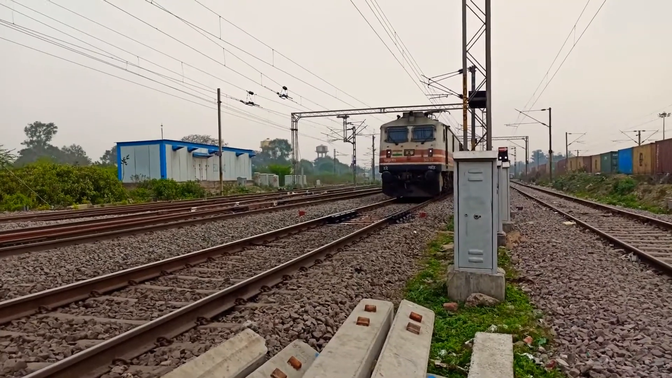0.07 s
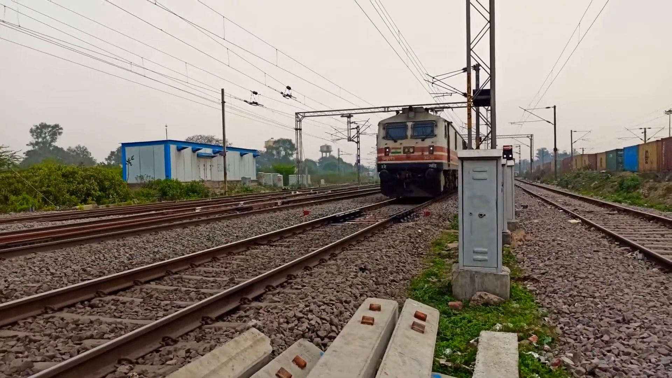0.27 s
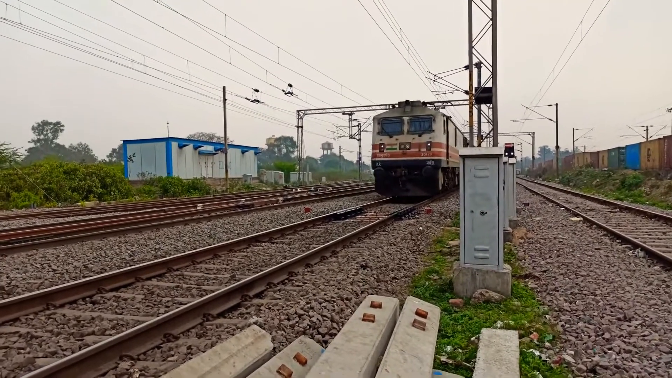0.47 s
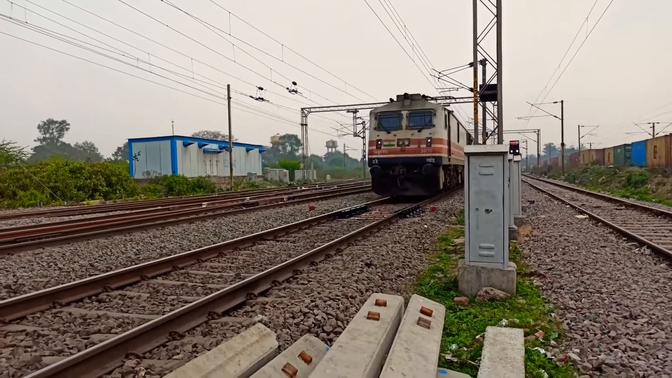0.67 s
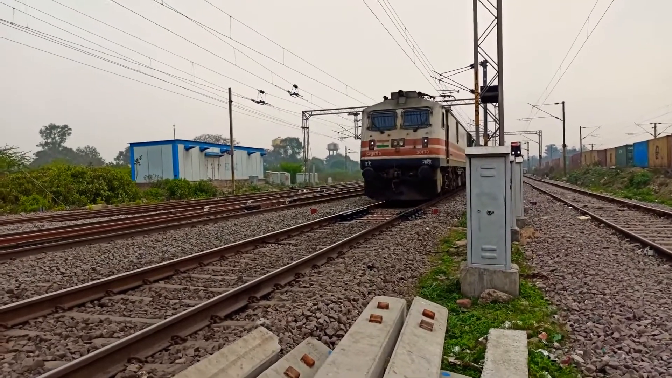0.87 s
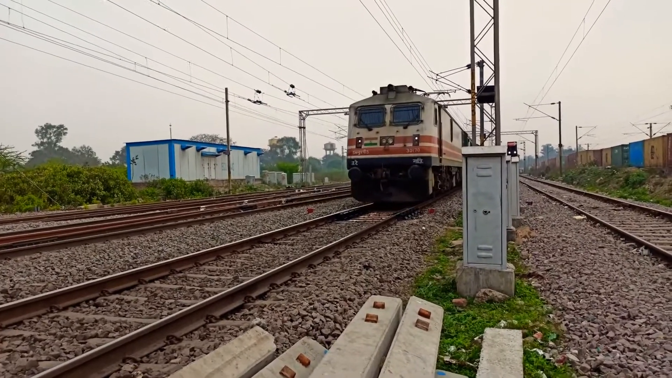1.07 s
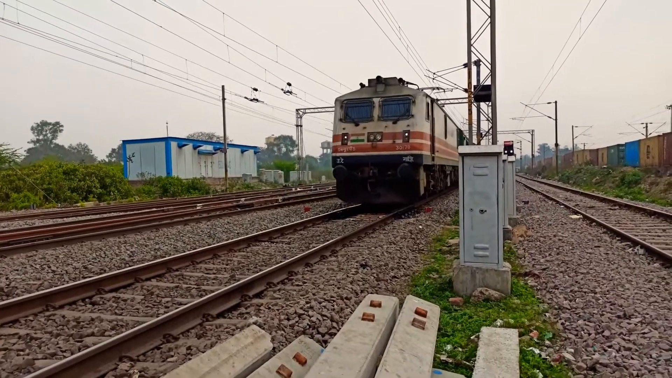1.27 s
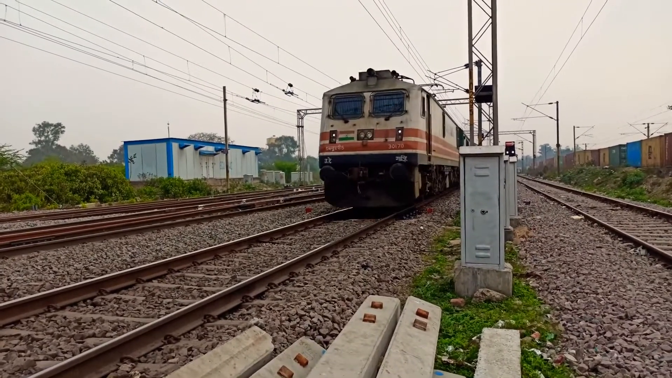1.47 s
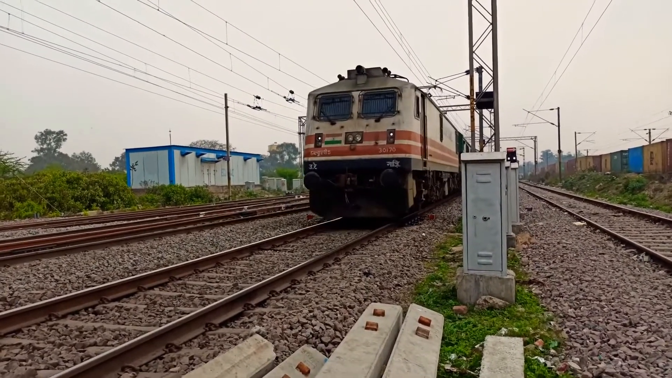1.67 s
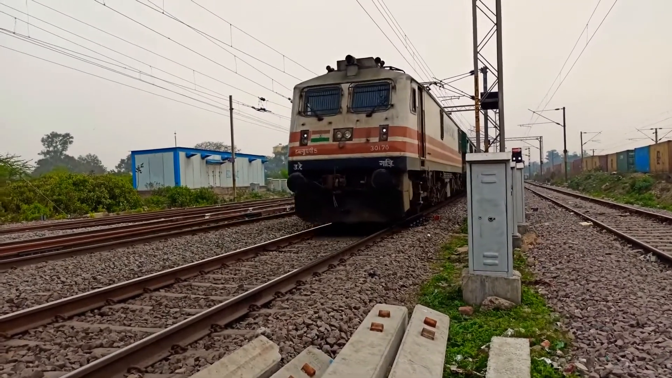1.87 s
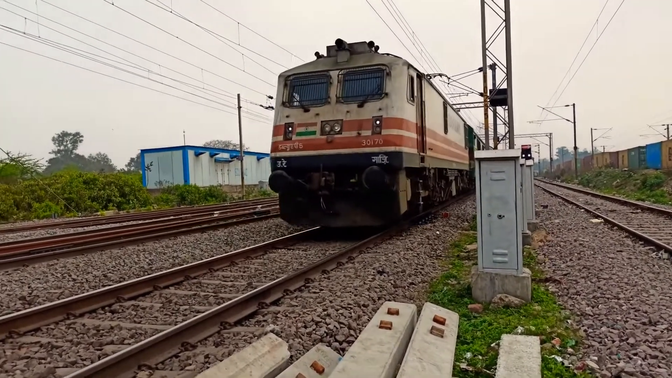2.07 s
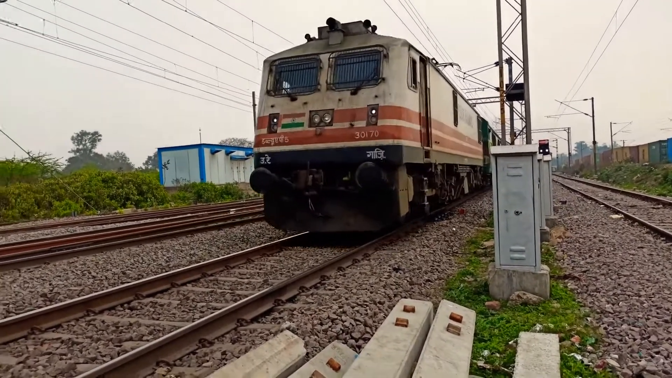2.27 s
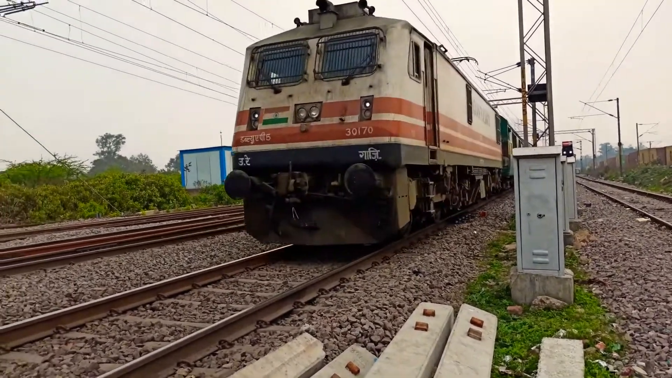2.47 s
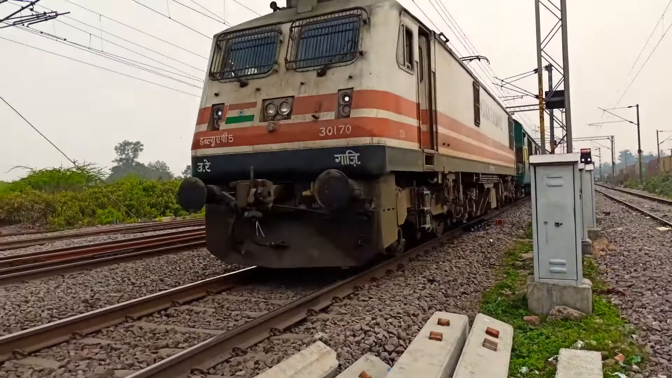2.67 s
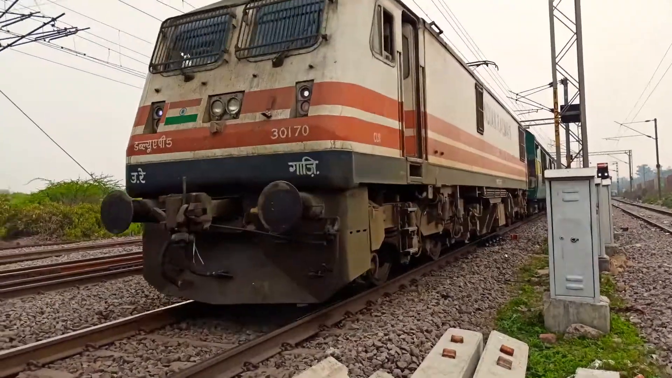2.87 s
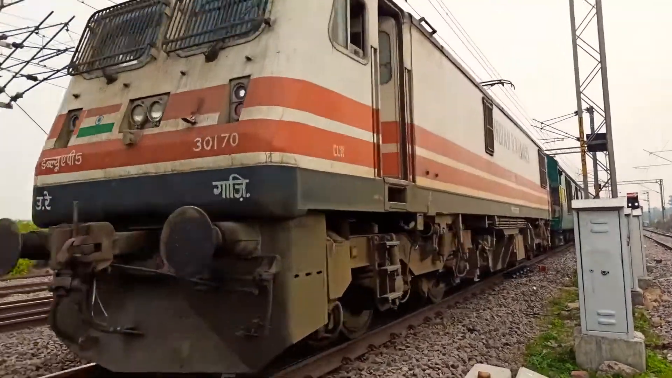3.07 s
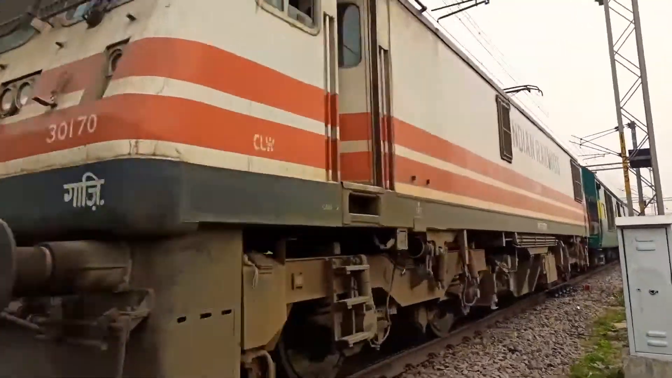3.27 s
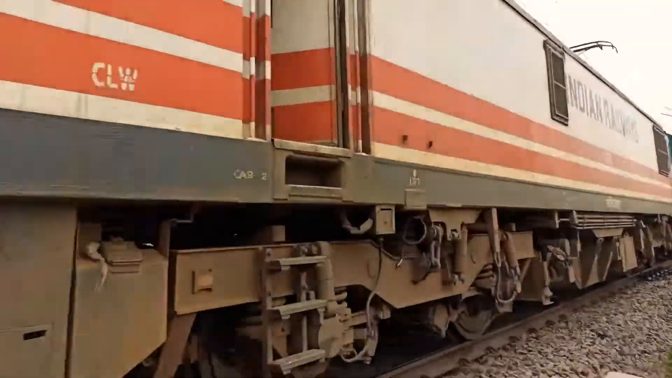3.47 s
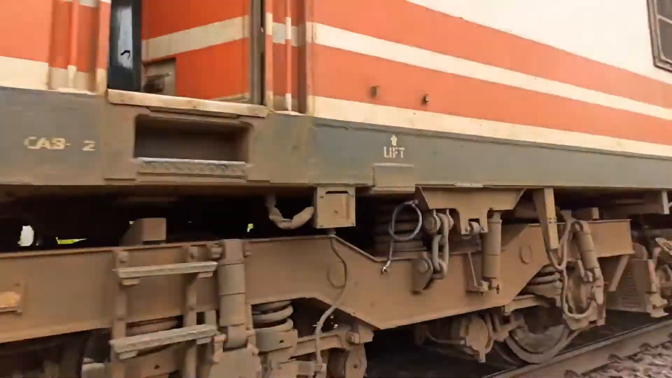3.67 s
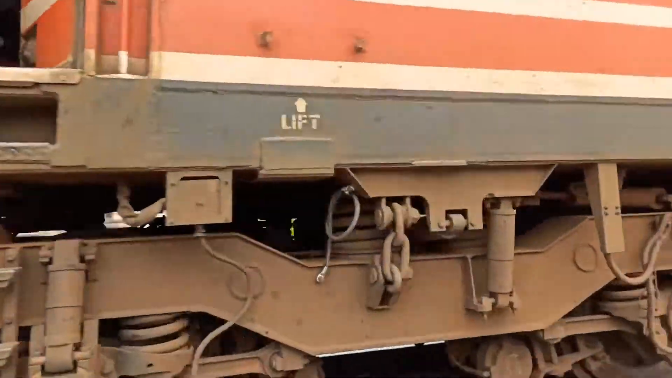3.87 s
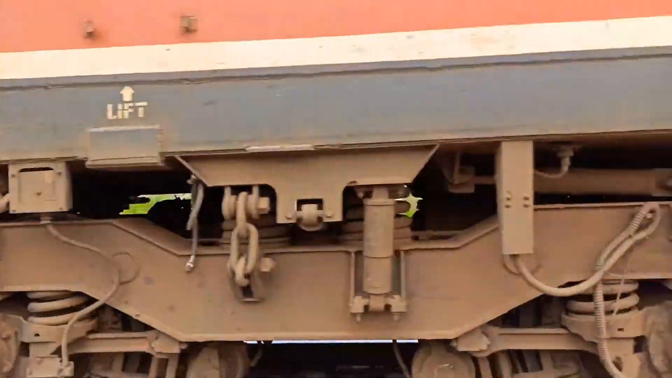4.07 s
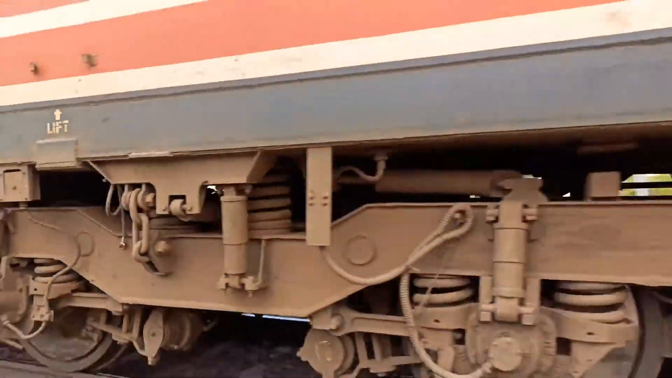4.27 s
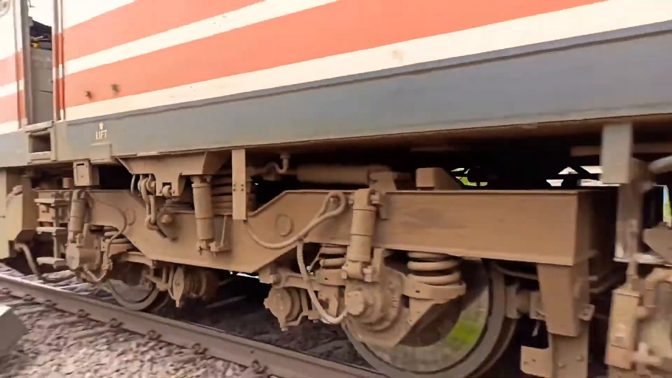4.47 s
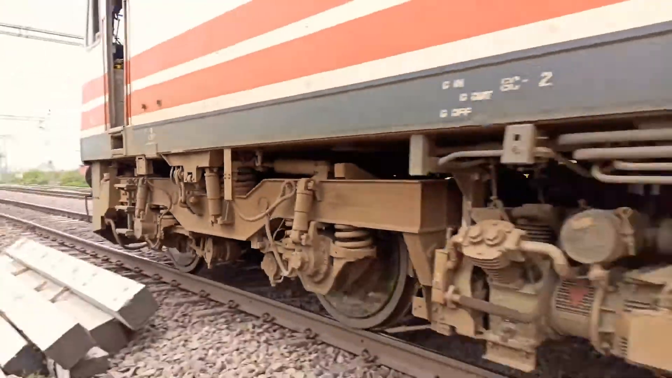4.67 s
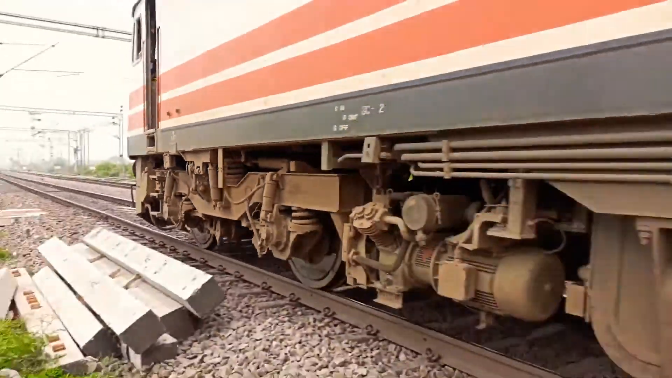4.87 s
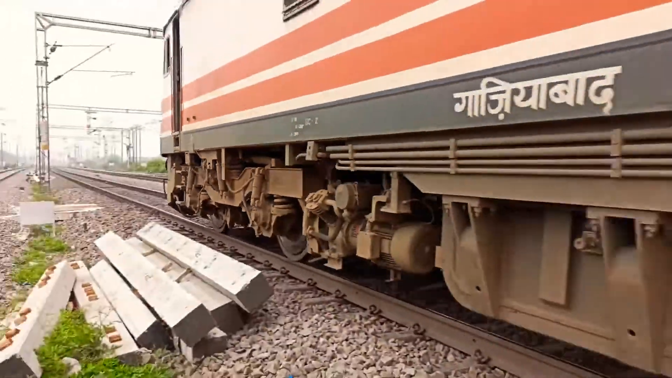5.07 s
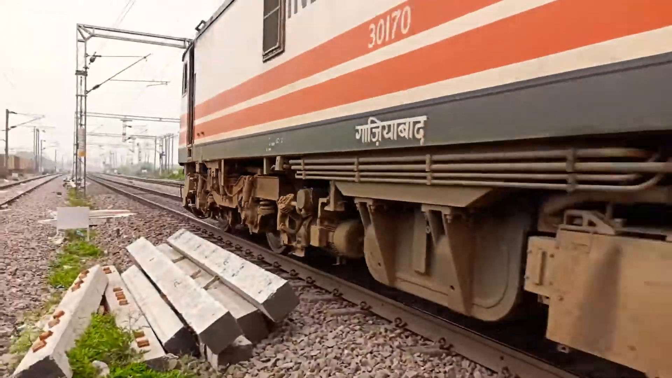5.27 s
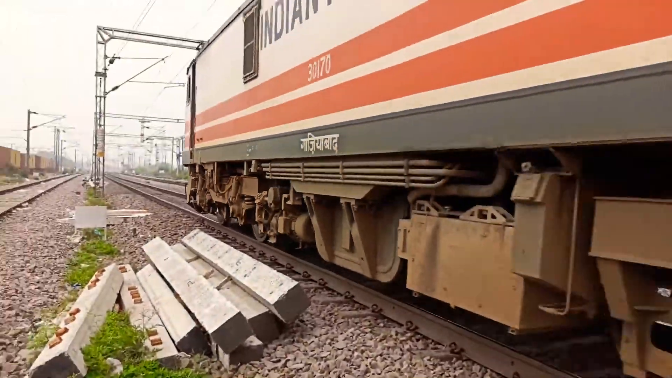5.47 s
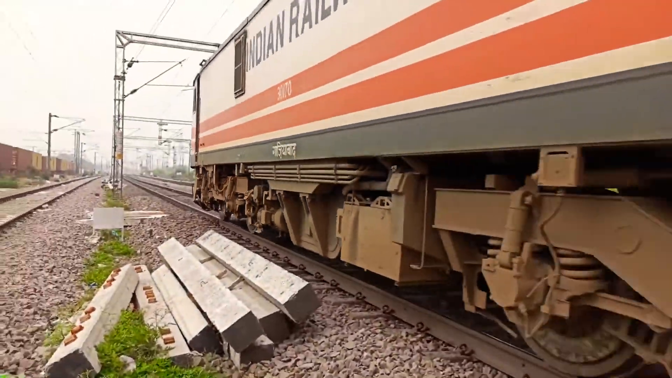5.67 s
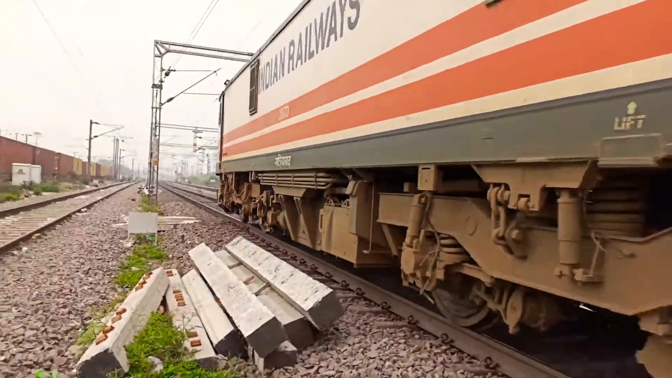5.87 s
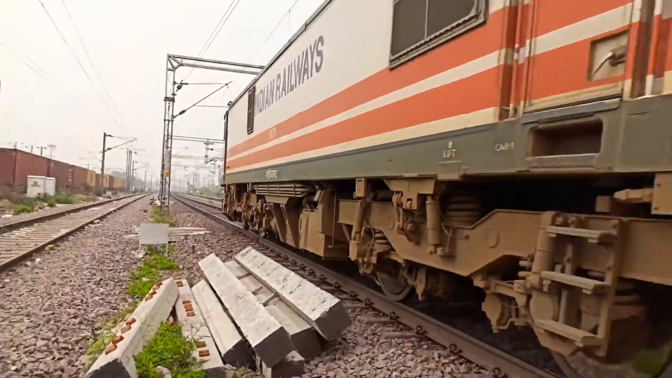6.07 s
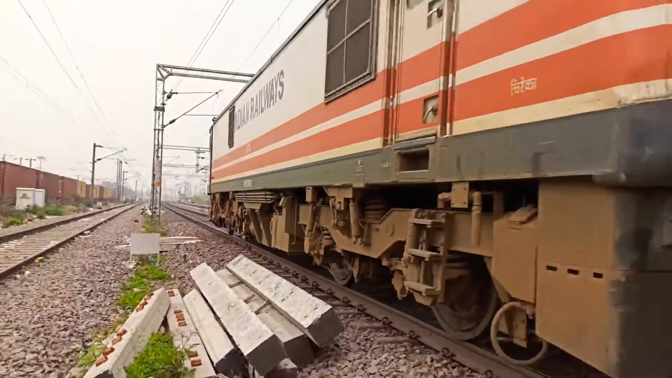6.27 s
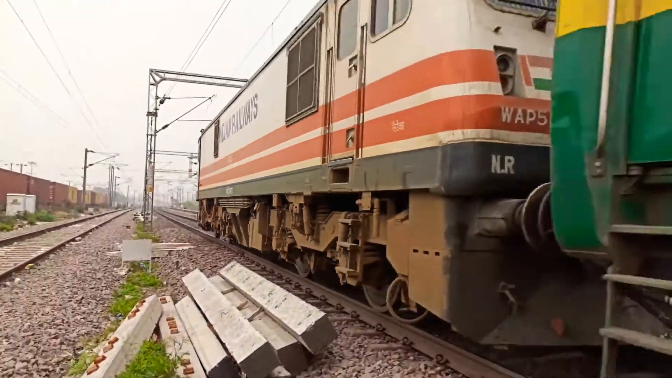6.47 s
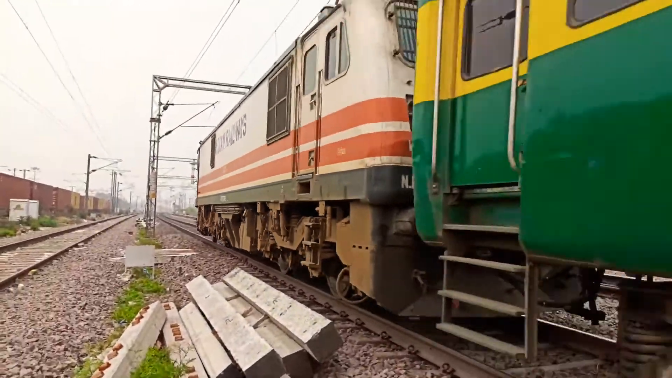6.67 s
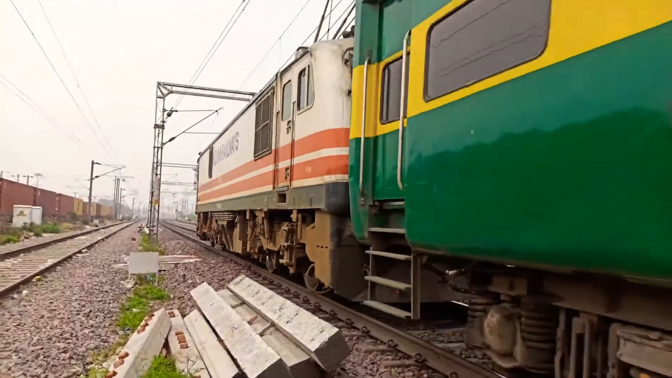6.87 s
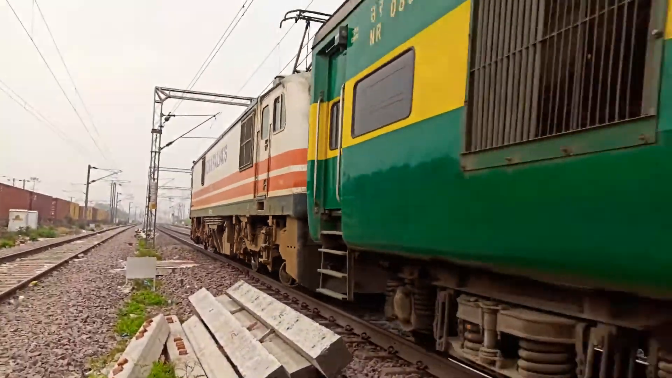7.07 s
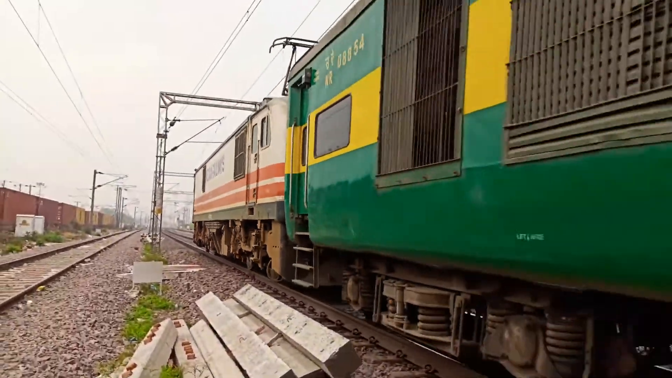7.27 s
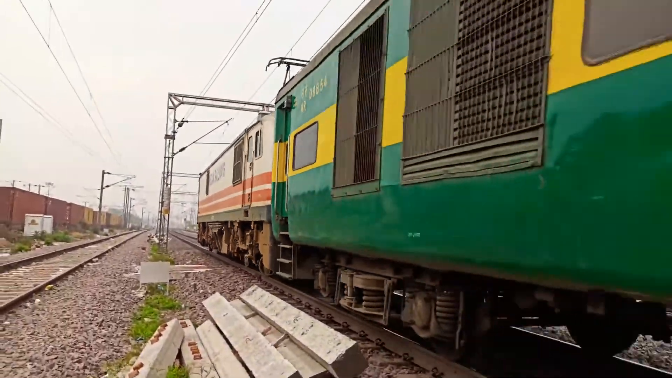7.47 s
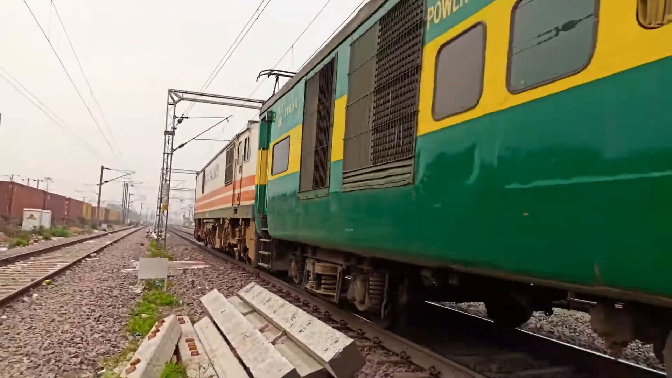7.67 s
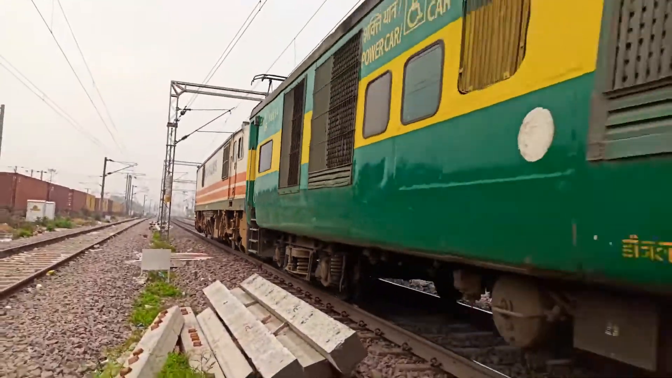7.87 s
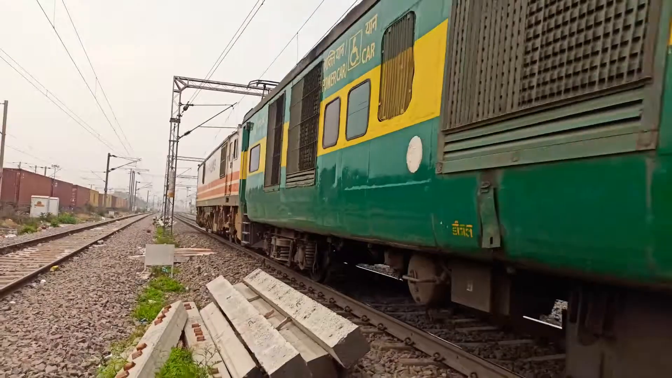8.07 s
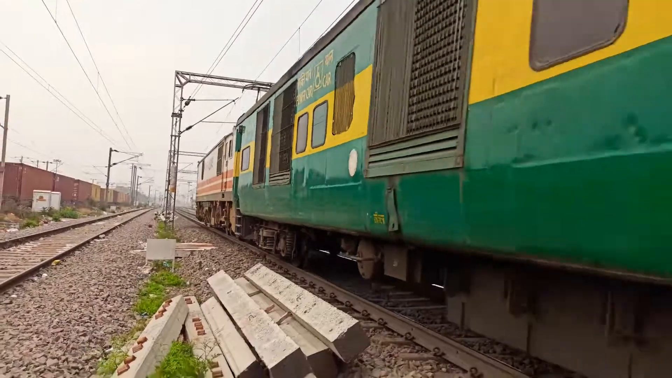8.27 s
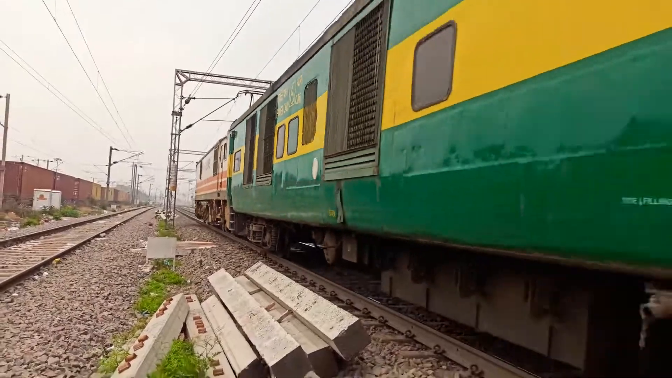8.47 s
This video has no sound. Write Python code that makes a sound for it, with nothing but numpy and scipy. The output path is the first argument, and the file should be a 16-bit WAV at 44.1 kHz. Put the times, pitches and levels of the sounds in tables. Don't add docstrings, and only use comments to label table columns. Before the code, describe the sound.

In the open beside a railway, a slow electric locomotive begins far off: a low, beating generator hum, soft rolling rumble and faint flange hiss. From about 0.55 s a thin, very high squeal sings in broken stretches. Between 1.7 and 2.2 s wheels knock over a rail joint in a rapid cluster of bright cracks, clanks and dull thuds. A piercing squeal follows immediately, and until 3.2 s several shrill metallic pitches overlap with scraping hiss, slightly overloading the close stereo microphone and pushing down the bass. Around 3.2 to 4.7 s motor whine flickers past, sinking slightly, with gear drones and swelling rumble. Another squeal and scrape burst comes near 4.7 s, fading by 5.5. At 6.25 s the coupling gap briefly thins the roar; then a coach rolls by to 8.5 s with heavy rumble, pulsing generator hum and weaker squeals.

```python
import sys
import numpy as np
from scipy import signal
from scipy.io import wavfile
from scipy.ndimage import uniform_filter1d

SR = 44100
rng = np.random.default_rng(int(sys.argv[2]) if len(sys.argv) > 2 else 0)


def volts_from_decibels(level):
    exponent = np.asarray(level, float) / 20
    return 10 ** exponent


def transcribe(u):
    v = np.clip(np.atleast_2d(u).T, -1, 1)
    q = np.round(v * 32767).astype(np.int16)
    wavfile.write(sys.argv[1], SR, q)


N = 375732


def evened(x):
    return x / np.sqrt(np.mean(abs(x) ** 2) + 1e-20)


def read(points, hz):
    f, value = np.transpose(points)
    return np.interp(np.log(hz + 1), np.log(f + 1), value)


def columns(rows, t):
    s, *rest = np.transpose(rows)
    return [np.interp(t, s, c) for c in rest]


def bump(t, s, width):
    return np.exp(-((t - s) / width) ** 2)


def bursts(rows, t, rise_db, fall_db, rest_db):
    coarse = t[::40]
    each = []
    for s, end, first, last in rows:
        end = max(end, s)
        corners = [s - 1, s, end, end + 1]
        each.append(np.interp(coarse, corners, [first - rise_db, first, last, last - fall_db]))
    return np.interp(t, coarse, np.maximum(np.max(each, axis=0), rest_db))


def inside(rows, t, hz):
    return np.any([(t >= a) & (t <= b) & (hz >= low) & (hz <= high) for a, b, low, high in rows], axis=0)


def lateness(hz, t):
    # t/s, lag/samples
    port_lag = [(0, -17), (2.7, -19), (3.2, 16), (4, 15), (8.52, 15)]
    spread_hz = 810
    in_step = 1 + (spread_hz / (hz + 1)) ** 4
    return np.exp(-2j * np.pi * hz * columns(port_lag, t)[0] / SR / in_step)


def noise(layers, size, patchy_db, flicker_db):
    # f/Hz, likeness/0-1
    likeness = [(60, 0.88), (250, 0.92), (600, 0.51), (950, 0.4), (1400, 0.35), (2200, 0.15), (5000, 0.12),
                (12000, 0.25)]
    hop = size // 4
    t = np.arange(N // hop + 5) * hop / SR
    hz = np.fft.rfftfreq(size, 1 / SR)[:, None]
    a, b, c, d, patches = rng.standard_normal((len(t), len(hz), 5)).T
    patches = uniform_filter1d(patches, size=10, axis=0)
    patches = evened(uniform_filter1d(patches, size=10, axis=1))
    flicker = evened(uniform_filter1d(rng.standard_normal(len(t)), size=4))
    power = 0
    for shape, db in layers:
        colour = volts_from_decibels(read(shape, hz)) ** 2
        power = power + colour / np.mean(colour) * volts_from_decibels(np.interp(t, np.arange(N) / SR, db)) ** 2
    same = np.clip(read(likeness, hz), 0, 1)
    right = a + 1j * b
    left = lateness(hz, t) * same * right + np.sqrt(1 - same ** 2) * (c + 1j * d)
    z = np.array([left, right]) * np.sqrt(power) * volts_from_decibels(patchy_db * patches + flicker_db * flicker)
    return signal.istft(z, nperseg=size, noverlap=size - hop)[1][:, :N] * np.sqrt(4 / size)


def tone(t, hz, width, db, steady, same, twist=0):
    same, steady = np.clip(same, 0, 1), np.clip(steady, 0, 1)
    r = np.exp(-np.pi * width / SR)
    a, b = rng.standard_normal((2, 2, len(t)))
    wander = signal.lfilter([1], np.convolve([1, -r], [1, -r]), a + 1j * b)
    right, other = np.sqrt(1 - steady) * evened(wander)
    late = np.exp(1j * twist) * lateness(hz, t)
    turn = np.exp(2j * np.pi * np.cumsum(hz * np.ones(len(t))) / SR)
    left = late * (same * right + np.sqrt(1 - same ** 2) * other + np.sqrt(steady))
    right = right + np.sqrt(steady)
    return np.sqrt(2) * volts_from_decibels(db) * (np.array([left, right]) * turn).real


def rolling(t, duck_db):
    # f/Hz, level/dB per Hz
    ground_shape, rumble_shape, roar_shape = [(15, -2.5), (40, -2.5), (55, -17), (90, -56.5)], [(15, -76.5), (41, -29.5), (59, -26),
                                                              (81, -5.5), (105, -7), (135, -3.5), (205, 1),
                                                              (249, -2), (344, -0.5), (700, -12.5),
                                                              (910, -51), (1540, -120)], [(220, -50), (380, -26),
                                                                              (455, -8), (600, 4.5),
                                                                              (782, 6.5), (1090, -1),
                                                                              (1600, -8.5), (2080, -45),
                                                                              (3520, -120)]
    plate_shape, web_shape = [(590, -24.5), (1000, -32.5), (1210, -5), (1840, -7), (2500, -10.5),
                              (3250, -21), (5500, -120)], [(1290, -18), (2200, -4), (3230, 2.5), (4720, -1.5),
                                             (4800, -8.5), (6080, -10), (6200, -5), (8170, -6.5),
                                             (8700, -16), (11300, -37.5), (19100, -120)]
    # t/s, rumble level/dB
    nearness = [(0, -27), (1.2, -24.5), (1.95, -20), (3.05, -21.5), (3.25, -19), (3.7, -17.5),
                (4.05, -17.5), (4.3, -13.5), (5.0, -17), (5.3, -14), (6.2, -14), (6.6, -12.5), (7.4, -14.5),
                (8.52, -13.5)]
    # level at -20 dB rumble/dB, share of nearness, share of ducking
    layer_rules = [(-25, 0.74, 0.98), (-35, 0.98, 1.46), (-29, 0.66, 0.84)]
    # t/s, half width/s, roar change/dB, web change/dB
    coupling = (6.25, .14, -4, -1)
    # t/s, half width/s, web gain/dB
    open_wheels = [
        (1.0, 0.11, 3.5),
        (2.7, 0.52, 5.5),
        (3.9, 0.26, 5.5),
        (5.1, 0.48, 2.5),
    ]
    # t/s, half width/s, roar and plate gain/dB
    axle_swells = [
        (3.28, 0.062, 5),
        (7.5, 0.15, 1.5),
        (3.9, 0.086, -1),
        (6.9, 0.1, 2.5),
        (8.1, .12, 2.5),
    ]
    db = columns(nearness, t)[0]
    roar_db, plate_db, web_db = [at + near * (db + 20) - ducked * duck_db for at, near, ducked in layer_rules]
    s, half, roar_gap_db, web_gap_db = coupling
    gap = bump(t, s, half)
    swell_db = sum(more_db * bump(t, at, half) for at, half, more_db in axle_swells)
    rumble_db = db - duck_db + 0.95 * swell_db + 0.5
    roar_db = roar_db + swell_db + roar_gap_db * gap + 0.5
    plate_db = plate_db + swell_db + 3.0
    web_db = web_db + sum(more_db * bump(t, at, half) for at, half, more_db in open_wheels)
    web_db = web_db + web_gap_db * gap + 0.5
    low = [(ground_shape, -28.5 - duck_db), (rumble_shape, rumble_db), (roar_shape, roar_db)]
    high = [(plate_shape, plate_db), (web_shape, web_db)]
    out = noise(low, size=2048, patchy_db=0.5, flicker_db=0.47)
    return out + noise(high, size=512, patchy_db=1.32, flicker_db=0.7)


def generators(t, duck_db):
    # t/s, mean f/Hz, level/dB, second order level/dB
    firing = [(0, 77.25, -19.5, -27), (1.7, 77.04, -23, -25), (2.6, 77.0, -24.5, -29.5),
              (3.4, 77.1, -22.5, -26.5), (4.1, 77, -32.5, -26.5), (4.42, 78.3, -18.5, -23.5),
              (6.2, 76.7, -22.5, -38), (6.8, 77.5, -19.5, -17.5), (7.4, 75.46, -17.5, -24.5),
              (8.52, 75.05, -22, -19)]
    # t/s, half width/s, loss/dB
    cancelling = [
        (.24, 0.1, 13),
        (1.05, 0.15, 5),
        (1.32, 0.18, 7.5),
        (4.2, 0.083, 1),
        (4.881, 0.11, 5),
        (5.5, 0.082, 28),
        (6.459, 0.13, 6),
        (7.65, 0.08, 10),
        (8.3, 0.092, 7),
    ]
    # multiple, level against the second/dB
    higher_orders = [(3, -14.5), (4, -7.5)]
    left_lead = 0.083
    beat_hz, beat_s = 2.64, 0.36
    slowing, slowing_s = 0.165, 5.94
    hz, db, second_db = columns(firing, t)
    db = db - 1.1 * duck_db - sum(lost * bump(t, s, half) for s, half, lost in cancelling)
    out = tone(t, hz, 1.5, db, 0.95, 0.5, left_lead)
    beats = beat_hz * (t - beat_s) - slowing * np.maximum(t - slowing_s, 0) ** 2
    beat = np.sqrt(2) * np.sin(np.pi * beats)
    out += tone(t, 2 * hz, 1.2, second_db - 1.2 * duck_db, 0.93, 0.9, left_lead) * beat
    for multiple, under_db in higher_orders:
        out += tone(t, multiple * hz, 4, second_db + under_db - duck_db, 0.6, 0.8)
    return out


def drones(t):
    # start t/s, end t/s, first f/Hz, last f/Hz, level/dB
    gear_drones = [(2.9, 3.9, 279, 277.7, -19), (3.75, 4.57, 276, 268.6, -22), (0, 2.1, 225, 224, -37),
                   (.35, 1.13, 275.7, 275, -34.5), (.65, 1.8, 204, 205.6, -33), (3.08, 3.23, 201, 204, -21),
                   (3.22, 3.4, 222, 222, -22), (3.52, 4.2, 222.4, 223.3, -21.5),
                   (4.1, 4.93, 223, 220.8, -14.5), (4.85, 5.93, 222.2, 219.4, -18),
                   (5.7, 6.75, 204.9, 202.5, -17.5), (6.55, 6.7, 159.2, 166, -19),
                   (6.9, 7.94, 198.5, 197.3, -15.5), (7.6, 8.1, 197, 195.4, -23.5),
                   (8.25, 8.5, 197, 198, -15)]
    out = np.zeros((2, N))
    for start, end, first_hz, last_hz, db in gear_drones:
        part = slice(round(start * SR), round(end * SR))
        span = t[part]
        hz = np.linspace(first_hz, last_hz, len(span))
        pair = tone(span, hz, 6, db, 0.88, 0.7) + tone(span, 2 * hz, 10, db - 13, 0.5, 0.8)
        out[:, part] += pair * signal.windows.tukey(len(hz), 0.4)
    return out


def motors(t, duck_db):
    # start t/s, end t/s, first level/dB, last level/dB
    whine = [(0, .6, -48, -31), (1.97, 2.02, -26, -25), (2.06, 2.45, -25, -27.5), (2.61, 3.2, -29, -25.5),
             (3.24, 3.36, -21, -20), (3.5, 3.62, -26, -26), (3.68, 3.78, -20, -19), (3.9, 4.0, -25, -26),
             (4.09, 4.12, -18, -19), (4.16, 4.19, -27, -25), (4.225, 4.25, -14, -16),
             (4.29, 4.31, -21, -19), (4.345, 4.37, -18, -22), (4.5, 4.55, -23, -24), (4.6, 4.75, -27, -25)]
    half_order = [
        (3.2, 3.4, -34.5, -26),
        (3.68, 3.84, -27, -22),
        (3.88, 3.97, -22, -26),
        (4.04, 4.16, -23.5, -19.5),
        (4.22, 4.3, -23, -30),
        (4.6, 4.68, -23, -25),
        (4.74, 4.8, -28, -29),
        (5.1, 5.42, -24, -25),
    ]
    pass_s, spread_s, doppler = 4.1, 1.3, 0.022
    hz = 1199.4 * (1 - doppler * np.tanh((t - pass_s) / spread_s))
    whine_db = bursts(whine, t, 200, 170, -35.0) - 2.5 - 0.8 * duck_db
    half_db = bursts(half_order, t, 160, 120, -37.5) - 0.55 * duck_db
    return tone(t, hz, 18, whine_db, 0.66, 0.21) + tone(t, hz / 2, 12, half_db, 0.6, 0.9)


def knocks(t):
    # t/s, peak level/dB, relative thud level/dB, t60/s, relative clank level/dB
    joint_knocks = [(1.714, -16.5, 6.5, 0.042, 0), (1.722, -13.5, -3, 0.05, -11),
                    (1.846, -11, -5, 0.028, -4.5), (1.853, -20, 1, 0.058, -3), (1.894, -15, -6, 0.023, 2),
                    (1.901, -11.5, -6.5, 0.069, -5), (1.925, -23, -9, 0.047, 2),
                    (2.012, -12, -19, 0.03, -23), (2.023, -10, -18, 0.046, -10),
                    (2.041, -23, -17, 0.03, -10), (2.126, -23.5, 8.5, 0.077, 0),
                    (2.168, -19, -14, 0.073, -17), (6.698, -32, 9, 0.034, 0)]
    # f/Hz, level/dB per Hz
    crack_shape, clank_shape, thud_shape = [(4500, -27), (5400, -12), (6300, 8), (8300, -1.5), (9000, -33),
                                            (15000, -37)], [(1400, -20), (2000, -33), (3000, -5), (4100, 2),
                                                           (4800, -9), (5400, -22.5)], [(150, -9), (400, 5), (800, 17),
                                                                          (1300, 0), (2000, 3),
                                                                          (2800, -6.5), (4000, -22)]
    crack, clank, thud = np.zeros((3, N))
    for s, db, thud_db, t60, clank_db in joint_knocks:
        part = slice(round(s * SR), round(s * SR) + SR // 2)
        since = np.maximum(t[part] - s, 0)
        crack[part] += volts_from_decibels(db - 60 * since / t60) * np.clip(since / 0.00098, 0, 1)
        clank[part] += volts_from_decibels(db + clank_db - 60 * since / (1.2 * t60)) * np.clip(since / 0.0016, 0, 1)
        thud[part] += volts_from_decibels(db + thud_db - 60 * since / (2.3 * t60)) * np.clip(since / 0.0024, 0, 1)
    out = np.zeros((2, N))
    for hit, shape in [(crack, crack_shape), (clank, clank_shape), (thud, thud_shape)]:
        out += hit * noise([(shape, np.full(N, -1.0))], size=256, patchy_db=1, flicker_db=0)
    return out


def blows(t):
    # t/s, f/Hz, peak level/dB, t60/s
    rail_rings = [(1.7155, 1000, -14, 0.039), (1.717, 2050, -24, .03), (1.724, 780, -17, 0.044),
                  (1.8465, 4000, -22, .03), (1.850, 850, -4.5, 0.036), (1.857, 500, -17, .04),
                  (1.8945, 6400, -13, 0.022), (1.8945, 4150, -17, .04), (1.9015, 6400, -7.5, .025),
                  (1.902, 820, -11, 0.047), (1.902, 4220, -19, .04), (2.013, 6300, -10, .03),
                  (2.021, 8120, -1, .04), (2.022, 6380, -11, .04), (2.039, 8150, -5, .03),
                  (2.040, 6400, -13, .03)]
    rise_s = 0.0012
    out = np.zeros((2, N))
    for s, hz, db, t60 in rail_rings:
        part = slice(round(s * SR), round(s * SR) + SR // 4)
        since = np.maximum(t[part] - s, 0)
        envelope = volts_from_decibels(db - 60 * since / t60) * (1 - np.exp(-since / rise_s))
        out[:, part] += envelope * np.sin(2 * np.pi * hz * since)
    return out


def chirps(t):
    # start t/s, end t/s, f/Hz, width/Hz, level/dB
    faint_rings = [(0.43, 0.64, 4710, 70, -33.5), (.66, .84, 4680, 120, -42), (0.49, 0.74, 2030, 90, -40),
                   (4.277, 4.327, 1283, 120, -19.5), (0.051, 0.5, 335, 40, -31),
                   (0.947, 1.993, 334.2, 27, -28), (2.189, 2.234, 6500, 410, -9),
                   (2.227, 2.34, 6210, 520, -8.5), (2.299, 2.855, 6130, 180, -17.5),
                   (2.665, 2.77, 4400, 250, -17), (2.779, 3.3, 3900, 90, -22),
                   (2.76, 2.92, 4600, 400, -20.5), (2.747, 3.195, 12000, 66, -28),
                   (3.648, 4.1, 2030, 45, -30.5), (3.886, 3.998, 2030, 45, -28),
                   (4.052, 4.141, 2005, 51, -21), (4.647, 4.696, 6100, 340, -18),
                   (4.663, 4.723, 6190, 360, -16), (4.65, 4.4, 12300, 280, -21.5),
                   (5.271, 5.419, 11960, 260, -30), (5.837, 5.962, 13240, 2000, -29),
                   (6.85, 7.25, 325, 10, -19), (6.6, 6.9, 270, 14, -19.5), (6.6, 7.6, 402, 16, -20.5),
                   (7.86, 8.0, 3200, 200, -29), (8.0, 8.15, 3170, 160, -27), (8.2, 8.65, 3160, 200, -27),
                   (7.8, 8.6, 3680, 300, -34)]
    out = np.zeros((2, N))
    for start, end, hz, width, db in faint_rings:
        part = slice(round(start * SR), round(end * SR))
        span = t[part]
        out[:, part] += tone(span, hz, width, db, 0.066, 0.59) * signal.windows.tukey(len(span), 0.7)
    return out


def scraping(t):
    # start t/s, end t/s, first level/dB, last level/dB
    flange_bites = [(0, .08, -41, -40), (.55, .72, -35.5, -39), (1.1, 1.55, -28.5, -53),
                    (2.03, 2.17, -31, -33.5), (2.26, 3.12, -23, -24), (3.36, 4.1, -23, -25.5),
                    (4.69, 5.18, -23, -26), (5.26, 5.6, -34, -41.5), (6.295, 6.58, -25, -29),
                    (6.9, 7.4, -34.5, -34.5), (7.65, 8.0, -37.5, -31.5), (8.25, 8.52, -35.5, -36)]
    fizz_hush = [
        (0, .45, 5, 3),
        (1.7, 2.2, 7.5, 10.5),
    ]
    # f/Hz, level/dB per Hz
    scrape_shape, fizz_shape = [(3300, -20.5), (4200, -6), (4700, -2.5), (4900, -6.5), (5500, -5),
                                (6200, -3), (7000, 1), (8400, -0.5), (8800, -25.5)], [(8600, -14.5), (11400, -27), (11700, 0), (12800, -2.5),
                                                (14800, -1.5), (15500, -9), (15800, -45)]
    # f/Hz, width/Hz, relative level/dB
    chatter_modes = [(4570, 67, -26), (6400, 290, -1), (7520, 260, -1)]
    db = bursts(flange_bites, t, 343, 97, -41.5)
    fizz_db = -38.5 + 0.79 * (db + 31.0) - bursts(fizz_hush, t, 80, 150, 0)
    out = noise([(scrape_shape, db + 3.0)], size=256, patchy_db=3.0, flicker_db=1.15)
    fizz = noise([(fizz_shape, fizz_db + 5.5)], size=512, patchy_db=1.2, flicker_db=0.5)
    out += fizz * volts_from_decibels([[-1.5], [1.5]])
    for hz, width, mode_db in chatter_modes:
        out += tone(t, hz, width, db + mode_db, 0, 0.066)
    return out


def squeals(t):
    mode_hz = [3888, 5248, 6711, 8159]
    # width/Hz, skirt width/Hz, skirt level/dB, left-right likeness/0-1, left phase lead/rad
    mode_shapes = [(22, 430, 0, 0.5, 0.95), (21, 190, 4, 0.7, 0.62), (35.5, 300, 4.5, 0.6, 0.33),
                   (28, 210, 3, 0.1, 2.75)]
    rest_levels = [-39.5, -76, -46, -76.5]
    # start t/s, end t/s, first level/dB, last level/dB
    mode_squeals = [[(0.047, 0.155, -38, -33), (.945, 1.053, -31, -25.5), (1.06, 1.12, -29, -30),
                     (1.875, 1.92, -34, -42), (2.694, 2.74, -31, -28), (2.755, 2.818, -16, -19),
                     (2.87, 2.967, -19.5, -22.5), (3.005, 3.065, -19.5, -17), (3.1, 3.168, -18.5, -19),
                     (3.225, 3.4, -25, -33), (3.47, 3.67, -36, -27), (3.74, 3.767, -21, -20.5),
                     (3.82, 3.97, -35, -25.5), (4.95, 5.15, -29.5, -41)], [(0, .2, -41, -52), (2.35, 2.412, -26, -22), (2.44, 2.467, -23, -26),
                                       (2.5, 2.585, -23, -10.5), (2.598, 2.7, -14.5, -22),
                                       (2.722, 2.755, -34, -24.5), (3.057, 3.194, -39, -37),
                                       (3.393, 3.554, -38, -31), (3.599, 4.116, -36, -31),
                                       (4.715, 4.78, -26, -36), (4.82, 5.092, -38, -34)], [(0.555, 0.605, -36, -22),
                                                         (0.62, 0.736, -19.5, -16),
                                                         (0.816, 1.007, -29.5, -32),
                                                         (1.122, 1.183, -23, -16),
                                                         (1.2, 1.208, -11.5, -15.5),
                                                         (1.228, 1.263, -15, -16),
                                                         (1.28, 1.587, -18.5, -16),
                                                         (1.625, 1.84, -19.5, -38), (2.03, 2.08, -30, -38),
                                                         (2.243, 2.3, -23, -29), (2.33, 2.4, -20, -24),
                                                         (2.43, 2.522, -18.5, -30),
                                                         (2.597, 3.26, -48, -27.5),
                                                         (3.337, 3.418, -31, -18),
                                                         (3.453, 3.543, -22, -18.5),
                                                         (3.622, 4.012, -30.5, -20),
                                                         (4.473, 4.49, -34, -31), (4.69, 4.716, -21, -24),
                                                         (4.767, 5.306, -18, -39),
                                                         (6.332, 6.572, -28.5, -29),
                                                         (6.869, 7.219, -28, -34), (7.273, 7.29, -26, -30),
                                                         (7.353, 7.602, -41, -35), (7.72, 7.76, -29, -32),
                                                         (7.905, 8.499, -31, -44.5)], [(.58, .7, -35, -45),
                                                                           (.9, 1.076, -40, -31.5),
                                                                           (2.059, 2.075, -17, -11),
                                                                           (2.095, 2.12, -16, -11),
                                                                           (2.125, 2.154, -10.5, -18),
                                                                           (2.16, 2.175, -15.5, -16),
                                                                           (2.19, 2.207, -22, -20),
                                                                           (2.245, 2.26, -24, -26),
                                                                           (2.3, 2.65, -32, -51),
                                                                           (2.737, 2.898, -22.5, -17.5),
                                                                           (2.93, 3.2, -19.5, -24),
                                                                           (3.37, 3.386, -21, -23),
                                                                           (3.613, 3.792, -33, -25),
                                                                           (3.88, 4.08, -34.5, -24.5),
                                                                           (4.72, 5.0, -42.5, -31),
                                                                           (5.05, 5.098, -26, -30.5),
                                                                           (5.334, 5.452, -27, -21.5),
                                                                           (6.297, 6.576, -52, -50),
                                                                           (7.595, 7.678, -33, -26.5),
                                                                           (7.7, 7.843, -27, -30.5),
                                                                           (7.85, 8.103, -34.5, -40.5)]]
    out = np.zeros((2, N))
    for hz, shape, rows, rest_db in zip(mode_hz, mode_shapes, mode_squeals, rest_levels):
        width, skirt, skirt_db, same, twist = shape
        db = bursts(rows, t, 900, 249, rest_db)
        line_db = db + 5.5 + 0.31 * (db + 17)
        steady = 0.3 + 0.05 * np.clip(db + 19.0, 0, 9)
        out += tone(t, hz, width, line_db, steady, same, twist)
        out += tone(t, hz + 40, skirt, np.minimum(db, -21) + skirt_db, 0, same, twist)
    return out


def scene():
    # start t/s, end t/s, first loss/dB, last loss/dB
    gain_ducks = [
        (2.08, 2.3, 7.5, 6.5),
        (2.35, 2.55, 7.5, 5.5),
        (2.75, 2.95, 3.5, 5.5),
        (3.42, 3.47, 5, 4),
        (4.8, 4.95, 3, 2.5),
    ]
    t = np.arange(N) / SR
    duck_db = bursts(gain_ducks, t, 82, 37, 0)
    background = rolling(t, duck_db) + generators(t, duck_db) + drones(t) + motors(t, duck_db)
    return background + knocks(t) + blows(t) + chirps(t) + scraping(t) + squeals(t)


def masked(x):
    # f/Hz, level/dB
    drop_gap = [(1000, -45), (1700, -30), (4600, -34), (5000, -27), (5400, -36), (8400, -23), (8800, -17.5),
                (11400, -15.5), (11700, -29.5), (15300, -38), (15700, -16)]
    # f/Hz, share/0-1
    random_holes = [(900, 0), (1500, .015), (4700, .015), (4950, .25), (5300, .03), (8500, .01),
                    (11600, .25), (14800, .3), (15250, .6), (15600, 1.01)]
    # start t/s, end t/s, low f/Hz, high f/Hz
    leaking = [(.02, .1, 8900, 11000), (.49, .55, 8900, 10200), (2.35, 2.75, 10400, 10700),
               (2.65, 2.72, 8900, 9300), (3.33, 3.39, 10400, 11400), (3.52, 3.58, 10300, 10600),
               (4.81, 4.88, 8900, 9700), (5.09, 5.18, 10300, 11200), (5.86, 5.93, 8900, 10300),
               (5.93, 5.99, 8900, 9400), (7.17, 7.23, 10300, 10800)]
    # start t/s, end t/s, low f/Hz, high f/Hz
    lost_cells = [(2.11, 2.18, 11500, 13800), (2.04, 2.11, 11500, 11900), (2.98, 3.19, 4850, 5100),
                  (2.23, 2.28, 3200, 3700), (2.35, 2.43, 3450, 3700), (2.44, 2.53, 3450, 3600),
                  (1.17, 1.28, 4750, 5050), (5.73, 5.77, 12400, 15600), (.33, .42, 13500, 14400),
                  (1.0, 1.08, 12900, 13700), (1.66, 1.71, 12300, 12900), (1.95, 2.005, 12200, 13900),
                  (1.8, 2.0, 8900, 11300), (2.2, 2.27, 1500, 1700), (2.47, 2.55, 1550, 1750),
                  (2.72, 2.86, 1600, 1800)]
    hz, t, z = signal.stft(x, SR, nperseg=2048, noverlap=1536)
    power = uniform_filter1d(abs(z) ** 2, size=4, axis=2).mean(0)
    cells = power[:-1].reshape(-1, 8, z.shape[2]).mean(1)
    cell_db, cell_hz = 10 * np.log10(cells + 1e-20), hz[4::8, None]
    loudness_db = 10 * np.log10(power.mean(0) + 1e-20)
    luck = uniform_filter1d(rng.standard_normal(cells.shape), size=6, axis=1)
    heard = cell_db - 0.7 * loudness_db + 11 + 5.0 * luck > read(drop_gap, cell_hz)
    rank = luck.argsort(axis=1).argsort(axis=1) / luck.shape[1]
    plain = cell_db < uniform_filter1d(cell_db, size=7, axis=0) + 1.5
    kept = heard & ~(plain & (rank < read(random_holes, cell_hz)))
    kept = kept | (inside(leaking, t, cell_hz) & (luck > -0.15))
    kept = kept & ~inside(lost_cells, t, cell_hz)
    z[:, :-1] *= np.repeat(kept, 8, axis=0)
    return signal.istft(z, SR, nperseg=2048, noverlap=1536)[1][:, :N]


def band_limit(x):
    return signal.sosfilt(signal.butter(12, 16000, fs=SR, output="sos"), x)


def record(dry):
    x = signal.sosfilt(signal.butter(6, 62, "high", fs=SR, output="sos"), dry)
    high = signal.sosfilt(signal.butter(4, 3300, "high", fs=SR, output="sos"), x)
    sums = signal.sosfilt(signal.butter(8, [9500, 14000], "band", fs=SR, output="sos"), high ** 2)
    limited = np.tanh((x + 0.2 * sums) / 1.356)
    mix = masked(limited)
    return band_limit(mix)


dry = scene()
out = record(dry)
transcribe(out)
```